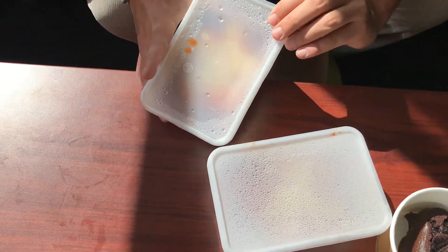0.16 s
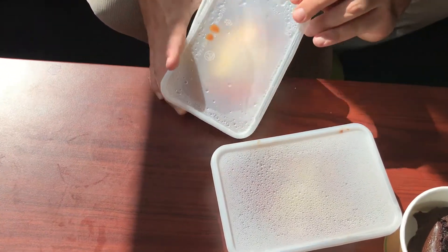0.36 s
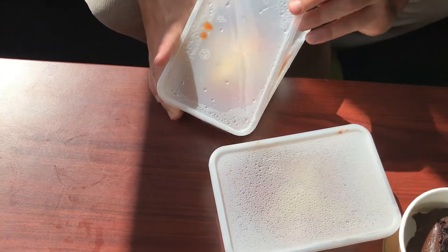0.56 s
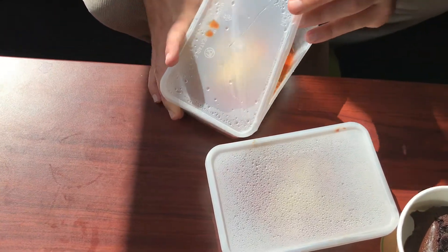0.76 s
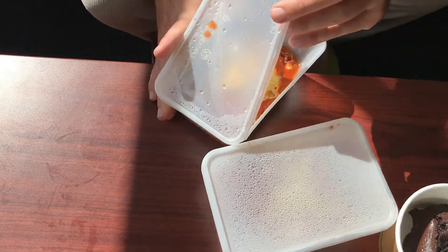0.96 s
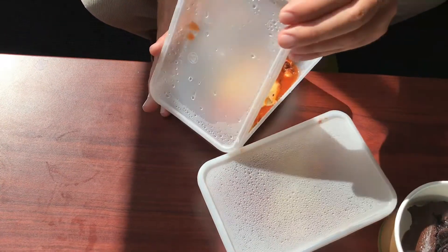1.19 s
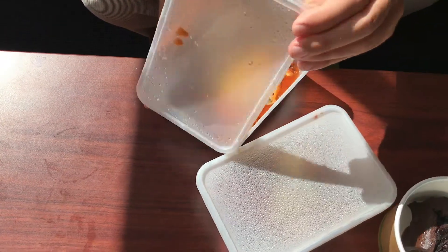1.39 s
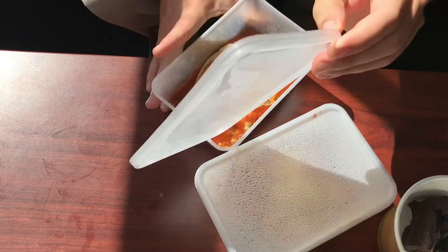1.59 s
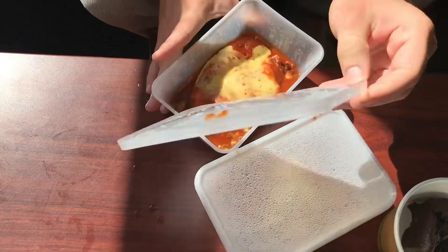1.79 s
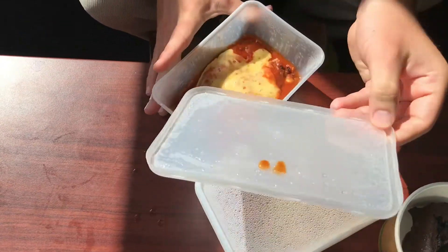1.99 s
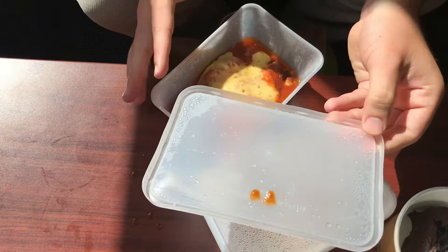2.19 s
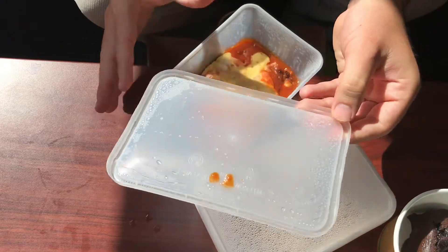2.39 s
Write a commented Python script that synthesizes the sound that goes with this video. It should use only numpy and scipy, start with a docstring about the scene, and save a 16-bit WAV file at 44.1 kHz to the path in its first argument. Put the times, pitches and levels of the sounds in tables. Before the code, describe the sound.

A plastic food tub lid snaps open in sharp loud cracks, then light knocks and ticks

```python
"""Prying a plastic lid off a tub

A plastic lid is pried off a food tub on a wooden table in a quiet room, close to a mono microphone.
The rim lets go in sharp snaps: noise bursts that ring the lid's modes and thump those of the table.
Lid and tub knock, fingers and lid rub and tick (random grains, small cracks with a hollow tok).
Table top and wall throw echoes, over the room's rumble and a wavering hum made of filtered noise."""
import sys
import numpy as np
from scipy import signal
from scipy.fft import rfft, irfft, next_fast_len
from scipy.io import wavfile
from scipy.ndimage import uniform_filter1d

SR = 44100
rng = np.random.default_rng(int(sys.argv[2]) if len(sys.argv) > 2 else 0)


def magnitude_from_level(level_db):
    """Linear magnitude for a level in decibels (20 dB per decade)."""
    exponent = np.asarray(level_db, float) / 20
    return 10 ** exponent


def digitize_waveform(pressure):
    """Quantize a signal to 16-bit integers and store it at the path in sys.argv[1].

    Rows of a 2-D input are taken as channels; values are limited to [-1, 1].
    """
    field = np.atleast_2d(pressure).T
    bounded = np.clip(field, -1, 1)
    quanta = np.round(bounded * 32767).astype(np.int16)
    wavfile.write(sys.argv[1], SR, quanta)


N = 108045  # length in samples

# Steady noise of the room. Each row: frequency in Hz, relative strength in dB per Hz.
AIR_SPECTRUM = [(15, -31.5), (30, -14), (70, -14), (97, -13), (127, -14), (175, -7), (249, -10),
                (384, -12.5), (641, -19.5), (1200, -19), (2000, -34.5), (3000, -43.5), (6000, -50),
                (10500, -53), (13000, -51), (16000, -73.5)]
AIR_DB = -56.5
# Fuzzy hum bands. Each row: centre in Hz, width in Hz (between the -6 dB points), level in dB.
HUM_BANDS = [(47.2, 6, -55), (92.5, 34, -58.5), (180, 70, -63.5)]
# Wavering of the lowest hum band. Each row: time in seconds, level in dB (only its distance from the mean counts).
HUM_WAVER = [(0.0, -56), (1.07, -56), (1.45, -63), (1.49, -55.5), (1.87, -69), (1.96, -45), (2.04, -62.5),
             (2.18, -52.5), (2.45, -57)]
# Fingers sliding on the lid. Each row: time in seconds, relative level in dB,
# treble lean in dB (added above 6 kHz, taken off below).
FINGER_SLIDE = [(0.0, -68.5, -3), (0.27, -70, 0.5), (0.39, -59, -9), (0.44, -62, -9.7), (0.54, -64, -1.5),
                (0.65, -66, 0), (0.82, -64, -2.5), (1.07, -54, 0.5), (1.34, -65.5, -4.2), (1.42, -58, -3.3),
                (1.55, -69, -4.2), (1.63, -69, 0.6), (1.96, -73, -0.8), (2.09, -63.5, 1.4),
                (2.45, -74, -2.3)]
GRAINS_PER_S, GRAIN_SPREAD_DB = 6000, 2.5
# Short scrapes. Each row: start in seconds, length in seconds, level in dB, centre in Hz,
# octaves from the centre to the -6 dB point, starting share of full strength (0 to 1).
SCRAPE_STROKES = [(0.019, 0.038, -69, 3930, 1.6, 0.7), (0.2095, .003, -51, 5500, 1.1, 0.5),
                  (.7, .03, -62.5, 4224, 1.2, .7), (0.831, 0.049, -58, 3540, 2.15, 0.55),
                  (1.265, 0.053, -60, 3360, 1.8, 0.56), (1.417, 0.038, -53.5, 4167, 0.94, 0.43),
                  (1.463, 0.027, -58, 2310, 0.92, 0.6), (1.518, 0.018, -60, 3020, 1.32, 0.6),
                  (1.915, 0.053, -64, 4970, 1.5, 0.97), (2.1025, 0.045, -54.5, 6510, .9, 0.91),
                  (2.1451, 0.022, -34, 5630, 0.77, 0.27), (2.175, 0.016, -64.5, 5000, 0.72, 0.76),
                  (2.436, 0.038, -65, 4480, 1.264, 0.43)]
STOP_SHARE = .2  # share of a scrape's length spent fading out
# Small ticks. Each row: start in seconds, crack level in dB, lid tok level in dB,
# crack tilt in dB per octave, favoured rim frequency in Hz.
SMALL_TICKS = [(0.0568, -43.5, -57, 8, 2570), (0.7071, -47.5, -64, -12, 4170), (0.8321, -54, -69, 6, 3100),
               (0.857, -37, -55.5, -2.2, 3230), (0.8734, -46, -50, -13, 3700), (0.9612, -48, -70, 2, 2530),
               (1.077, -32.5, -50, -4.5, 3960), (1.2431, -39.5, -64, 5, 3530),
               (1.2772, -45.5, -57, -5, 3240), (1.4674, -58.5, -51, -5, 3980),
               (1.4735, -54.5, -44, 0.8, 3590), (1.5226, -47.5, -66, 13, 4180),
               (1.5557, -44, -43, -7.5, 3100), (1.6559, -46.5, -82, 10, 5920),
               (1.6674, -59.5, -75.5, 2, 5980), (1.9172, -39.5, -59.5, 1.8, 4240),
               (2.1035, -42.5, -74, -1.5, 7260), (2.1429, -38.5, -52.5, -9, 3270)]
TICK_DECAY_S = 0.0081
TOK_HZ, TOK_SPREAD_OCT, TOK_RISE_S = 640, .05, .004
# Knocks of lid and tub. Each row: start in seconds, crack level in dB, lid ring level in dB,
# table thump level in dB, favoured lid frequency in Hz, crack tilt in dB per octave,
# burst decay setting in seconds, favoured rim frequency in Hz.
LID_KNOCKS = [(.5657, -20, -28, -45.5, 1036, -5, 0.0068, 9300),
              (1.0075, -63, -37, -28, 600, 5, 0.014, 2900),
              (1.3853, -22.5, -30, -31.5, 1100, -1, 0.0063, 5900),
              (2.1798, -20, -27, -19.5, 800, -5, 0.011, 2350)]
# The rim snapping free. Each row: start in seconds, crack level in dB, lid ring level in dB,
# table thump level in dB, favoured lid frequency in Hz, crack tilt in dB per octave,
# burst decay setting in seconds, favoured rim frequency in Hz.
RIM_SNAPS = [(0.2317, 4, -11, -35, 630, 3, 0.0098, 5200), (0.247, -1.5, -12, -25, 755, -2.5, 0.014, 3700),
             (0.278, 4, -15.5, -26, 880, 1.5, 0.0063, 6500),
             (0.3741, -2.5, -13, -49, 980, -2.5, 0.0052, 10000)]
KNOCK_SPREAD_OCT, SNAP_SPREAD_OCT = 0.91, 0.36  # how wide a part of the lid rings
CRACK_RISE_S, SPIKE_DB, RIM_DB = .0003, 2.5, -8
THUMP_S, THUMP_LAG_S = .002, .0025
# Ways the lid rings. Each row: frequency in Hz, strength in dB, time to fall 60 dB in seconds.
LID_MODES = [(420, -11, .02), (500, -8, .02), (590, -3, .022), (640, -3, .025), (700, -1, .026),
             (780, -4, .02), (865, -2, .028), (940, -4, .02), (1020, -1, .03), (1100, -4, .02),
             (1200, -5, .018), (1330, -5, .018), (1500, -3, .018), (1650, -3, .016)]
# Ways the stiff rim rings. Each row: frequency in Hz, strength in dB, time to fall 60 dB in seconds.
RIM_MODES = [(2150, -3, .004), (2900, -4, .004), (3600, -2, .006), (4400, -4, .003), (5600, -1, .004),
             (7000, -3, .003), (9300, -1, .002), (12000, -3, .002), (14500, -2, .002)]
# Ways the table rings. Each row: frequency in Hz, strength in dB, time to fall 60 dB in seconds.
TABLE_MODES = [(98, -8, .09), (140, -5, .08), (180, -1, .1), (215, -4, .06), (258, -4, .07), (300, -7, .04),
               (350, -8, .035), (430, -8, .03), (520, -6, .025), (620, -6, .02)]
# Echoes off table top and wall. Each row: delay in seconds, level in dB.
NEAR_ECHOES = [(.0013, -7.5), (.0036, -9), (.0058, -12.5), (.0140, -17), (0.0158, -18.5)]
ECHO_BLUR = .25  # decay setting of the scatter, per second of delay
# Fading of the room's tail. Each row: frequency in Hz, time to fall 60 dB in seconds.
ROOM_DECAY = [(150, 0.41), (500, 0.26), (1500, 0.26), (4000, 0.29), (10000, 0.2)]
ROOM_DB = -11.5
# Colour the microphone gives the lid's sounds. Each row: frequency in Hz, gain in dB.
MIC_RESPONSE = [(20, -35.5), (60, -13.5), (120, -2), (200, 2.54), (4400, 0.66), (5000, -4.5), (5600, -0.96),
                (9500, -3.25), (10600, -7.5), (11800, -1.1), (15600, -6), (16200, -8.5)]
CEILING, EDGE_HZ = .8, 16400  # clipping level, upper band limit


def evened(x):
    """Scales to rms 1."""
    return x / np.sqrt(np.mean(x ** 2) + 1e-20)


def peaked(x):
    """Scales to peak 1."""
    return x / (np.abs(x).max() + 1e-20)


def read(points, hz):
    """Reads a table on a log-frequency axis."""
    f, value = np.transpose(points)
    return np.interp(np.log(hz + 1), np.log(f + 1), value)


def add(mix, start_s, sound):
    """Adds a sound at a time, cutting what runs past the end."""
    part = mix[round(start_s * SR):][:len(sound)]
    part += sound[:len(part)]


def shaped(x, db_of):
    """Filters by a gain in dB given as a function of frequency."""
    size = next_fast_len(len(x) + 2048)
    gain = magnitude_from_level(db_of(np.fft.rfftfreq(size, 1 / SR)))
    return irfft(rfft(x, size) * gain, size)[:len(x)]


def causal(db_of):
    """Minimum-phase filter taps of a gain curve in dB: nothing sounds ahead of its cause."""
    log_gain = np.log(magnitude_from_level(db_of(np.abs(np.fft.fftfreq(8192, 1 / SR)))))
    spectrum = np.exp(np.conj(signal.hilbert(log_gain)))
    return np.fft.ifft(spectrum).real[:4096]


def tilted(x, db_per_oct, low_hz):
    """Cuts the bass and tips the treble about 6 kHz."""
    x = signal.lfilter(*signal.butter(2, low_hz, "high", fs=SR), x)
    taps = causal(lambda hz: db_per_oct * np.log2(np.clip(hz, 2000, 16000) / 6000))
    return signal.fftconvolve(x, taps)[:len(x)]


def puff(decay_s, size, rise_s=1e-4, spike=0):
    """A dying burst of noise with a nearly even spectrum and energy 1."""
    t = np.arange(size) / SR
    x = rng.standard_normal(size) * np.minimum(t / rise_s, 1) * magnitude_from_level(-60 * t / decay_s)
    x[round(rise_s * SR)] += spike
    z = rfft(x)
    smooth_power = uniform_filter1d(abs(z) ** 2, size // 100 + 1)
    # evening out the spectrum smears the burst, so it is faded once more
    x = irfft(z / np.sqrt(smooth_power), size) * magnitude_from_level(-20 * t / decay_s)
    return x / np.linalg.norm(x)


def ring(modes, centre_hz, octaves):
    """Dying modes of chance strength, neighbours in opposite sense, favoured near where the thing bends."""
    t, out = np.arange(0, .2, 1 / SR), 0
    chance = rng.uniform(-1, 1, (len(modes), 2))
    for (hz, db, t60), (luck, detune) in zip(modes, chance):
        near_db = -6 * (np.log2(hz / centre_hz) / octaves) ** 2
        fade = magnitude_from_level(db + near_db + 2 * luck - 60 * t / t60)
        out = fade * np.sin(2 * np.pi * hz * (1 + 0.032 * detune) * t) - out
    return out


def grit(size):
    """Dense tiny slips of uneven size, as when one surface drags over another."""
    slips = rng.standard_normal(size) * (rng.random(size) < GRAINS_PER_S / SR)
    return slips * magnitude_from_level(GRAIN_SPREAD_DB * np.minimum(rng.exponential(1, size), 4))


def crack(decay_s, db_per_oct, rim_hz):
    """A spike in a burst of noise, heard plain and through the stiff rim."""
    burst = puff(decay_s, size=2600, rise_s=CRACK_RISE_S, spike=magnitude_from_level(SPIKE_DB))
    rim = signal.fftconvolve(burst, ring(RIM_MODES, rim_hz, .4))[:len(burst)]
    plain = tilted(burst, db_per_oct, low_hz=1100)
    return peaked(magnitude_from_level(RIM_DB) * peaked(rim) + peaked(plain))


def air():
    """Steady rumble and hiss of the room, with fuzzy hum bands, the lowest one wavering."""
    noise = shaped(rng.standard_normal(N), lambda hz: read(AIR_SPECTRUM, hz))
    out = magnitude_from_level(AIR_DB) * evened(noise)
    t, db = np.transpose(HUM_WAVER)
    waver = magnitude_from_level(np.interp(np.arange(N) / SR, t, db - db.mean()))
    for k, (f, width, level_db) in enumerate(HUM_BANDS):
        band = shaped(rng.standard_normal(N), lambda hz: -20 * np.log10(1 + (2 * (hz - f) / width) ** 2))
        out += magnitude_from_level(level_db) * evened(band) * (waver if k == 0 else 1)
    return out


def room(x):
    """Near echoes, each a little scattered, and a tail of sparse taps dying band by band."""
    near = np.zeros(2000)
    near[0] = 1  # the direct sound
    for delay_s, db in NEAR_ECHOES:
        add(near, delay_s, magnitude_from_level(db) * puff(ECHO_BLUR * delay_s, size=800))
    taps = np.zeros(SR)
    slots = np.arange(200, SR - 12, 12)
    at = slots + rng.integers(0, 12, len(slots))  # one tap at a chance place in each slot
    taps[at] = rng.choice([-1., 1.], len(at))
    hz, t, z = signal.stft(taps, SR, nperseg=256)
    fade = magnitude_from_level(-60 * t / read(ROOM_DECAY, hz)[:, None])
    tail = signal.istft(z * fade, SR, nperseg=256)[1]
    tail = tail / np.linalg.norm(tail)
    return signal.fftconvolve(x, near)[:N] + magnitude_from_level(ROOM_DB) * signal.fftconvolve(x, tail)[:N]


def slide():
    """A faint rustle of skin on plastic, darker or brighter as the grip changes."""
    t, db, lean_db = np.transpose(FINGER_SLIDE)
    now = np.arange(N) / SR
    rustle = tilted(grit(size=N), -2.8, low_hz=895)
    high = signal.lfilter(*signal.butter(2, 6000, "high", fs=SR), rustle)
    lean = magnitude_from_level(np.interp(now, t, lean_db))
    colour = evened(rustle - high) / lean + evened(high) * lean
    return magnitude_from_level(np.interp(now, t, db)) * colour * 0.59


def scrapes():
    """Short strokes of grit around one colour: quick start, swell, abrupt end."""
    out = np.zeros(N)
    for s, length, db, centre_hz, octaves, first in SCRAPE_STROKES:
        x = shaped(grit(size=4410),
                   lambda hz: np.maximum(-6 * (np.log2((hz + 1) / centre_hz) / octaves) ** 2, -24))
        u = np.arange(len(x)) / SR / length  # progress, 1 at the end of the stroke
        stroke = np.clip(np.minimum(first + u, (1 - u) / STOP_SHARE), 0, 1)
        add(out, s, magnitude_from_level(db) * evened(x) * stroke)
    return out


def ticks():
    """Small releases: a little crack and a soft hollow tok of the lid's modes."""
    out = np.zeros(N)
    for s, crack_db, lid_db, tilt, rim_hz in SMALL_TICKS:
        tok = ring(LID_MODES, TOK_HZ, TOK_SPREAD_OCT)
        rise = np.minimum(np.arange(len(tok)) / SR / TOK_RISE_S, 1)
        add(out, s, magnitude_from_level(crack_db) * crack(TICK_DECAY_S, tilt, rim_hz))
        add(out, s, magnitude_from_level(lid_db) * peaked(tok * rise))
    return out


def blows(rows, octaves):
    """Each blow cracks, rings the lid and gives a softer, slower thump into the table."""
    out = np.zeros(N)
    push = np.hanning(max(round(THUMP_S * SR), 3))
    for s, crack_db, lid_db, thump_db, lid_hz, tilt, decay_s, rim_hz in rows:
        lid = signal.fftconvolve(ring(LID_MODES, lid_hz, octaves), puff(decay_s, size=2600))
        thump = np.convolve(ring(TABLE_MODES, 300, 3.1), push)
        add(out, s, magnitude_from_level(crack_db) * crack(decay_s, tilt, rim_hz))
        add(out, s + 0.00029, magnitude_from_level(lid_db) * peaked(lid))
        add(out, s + THUMP_LAG_S, magnitude_from_level(thump_db) * peaked(thump))
    return out


def knocks():
    """Lid and tub knock, ringing a wider part of the lid."""
    return blows(LID_KNOCKS, KNOCK_SPREAD_OCT)


def snaps():
    """The rim lets go in sharp snaps, ringing a narrower part of the lid."""
    return blows(RIM_SNAPS, SNAP_SPREAD_OCT)


def scene():
    """Everything reaches one microphone, copied to two equal channels."""
    lid = room(snaps() + knocks() + ticks() + scrapes() + slide())
    heard = signal.fftconvolve(lid, causal(lambda hz: read(MIC_RESPONSE, hz)))[:N]
    return np.tile(heard + air(), (2, 1))


def roll_off(x):
    """The treble ends steeply here."""
    return signal.sosfilt(signal.butter(12, 16810, fs=SR, output="sos"), x)


def record(dry):
    """Clips the loudest peaks, then cuts off the highest treble."""
    clipped = np.clip(dry, -CEILING, CEILING)
    lowpass = signal.firwin(255, EDGE_HZ, window=("kaiser", 9), fs=SR)
    mix = signal.oaconvolve(clipped, lowpass[None], "same")
    return roll_off(mix)


dry = scene()
out = record(dry)
digitize_waveform(out)
```